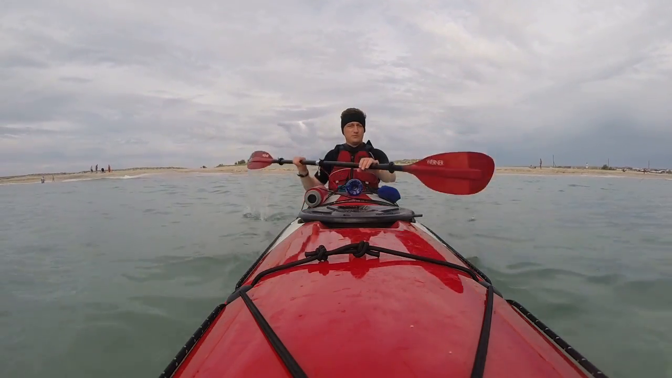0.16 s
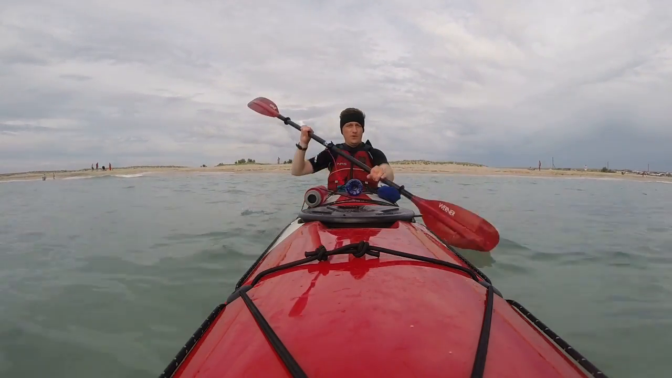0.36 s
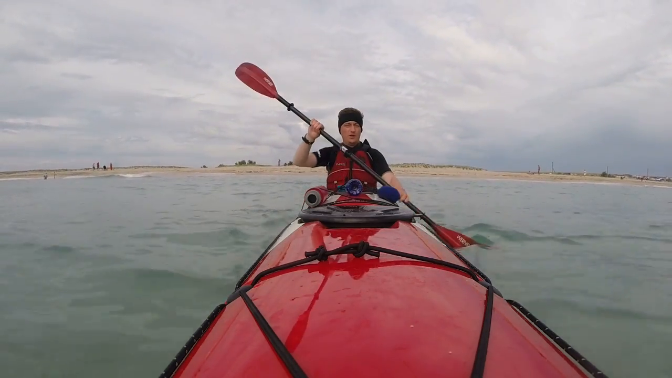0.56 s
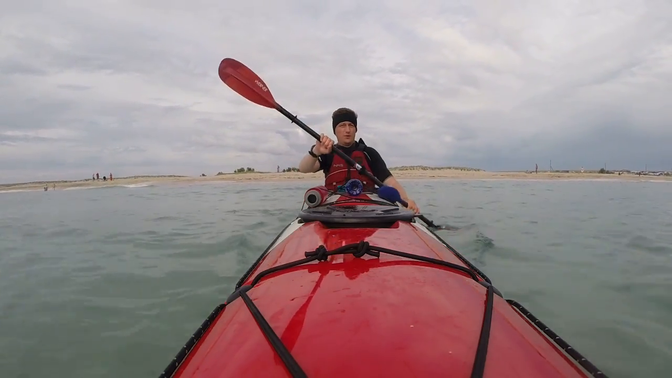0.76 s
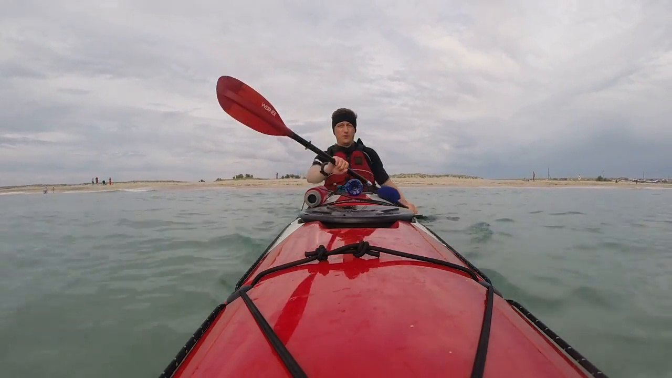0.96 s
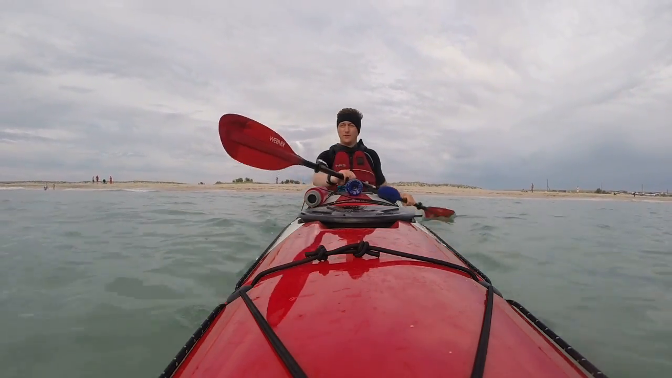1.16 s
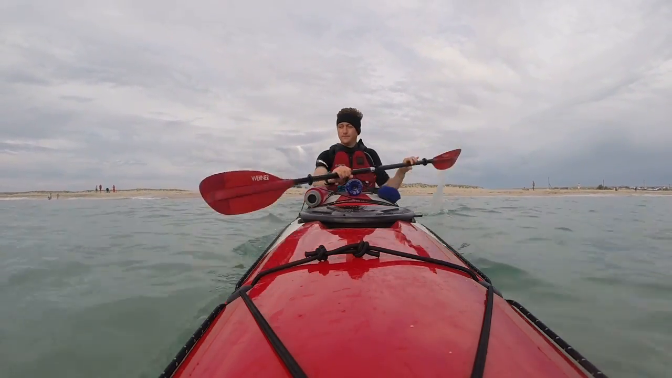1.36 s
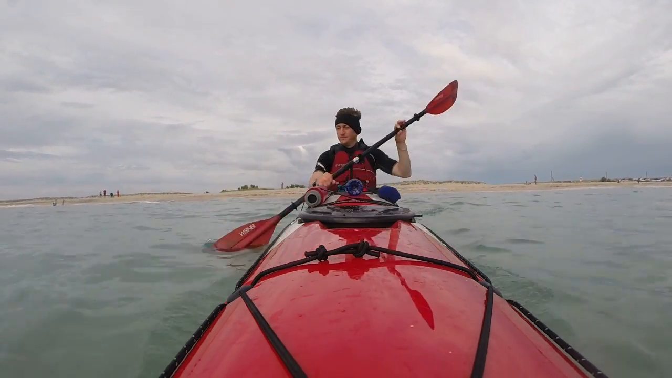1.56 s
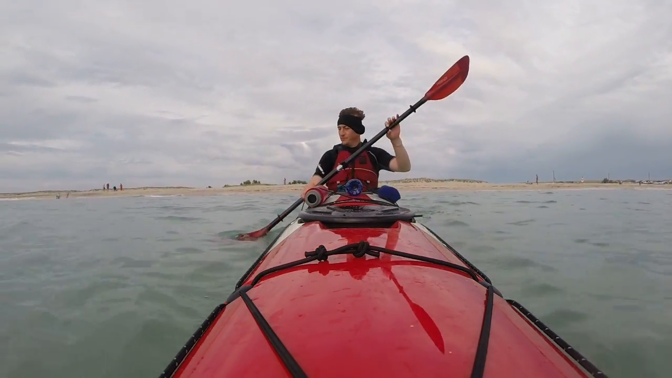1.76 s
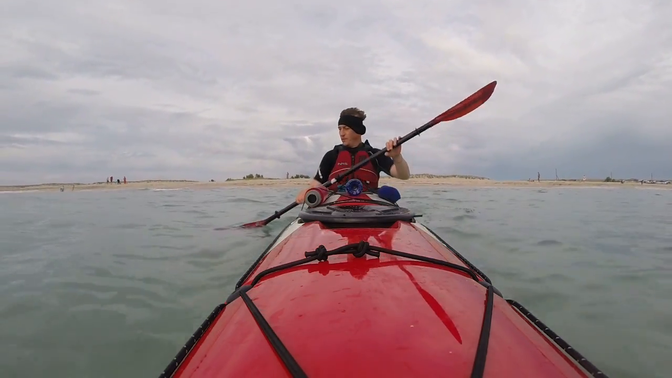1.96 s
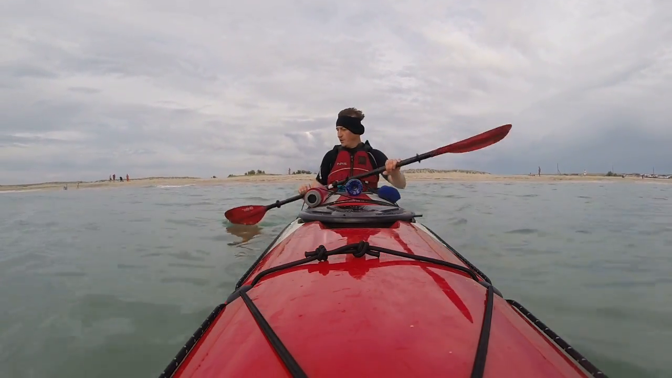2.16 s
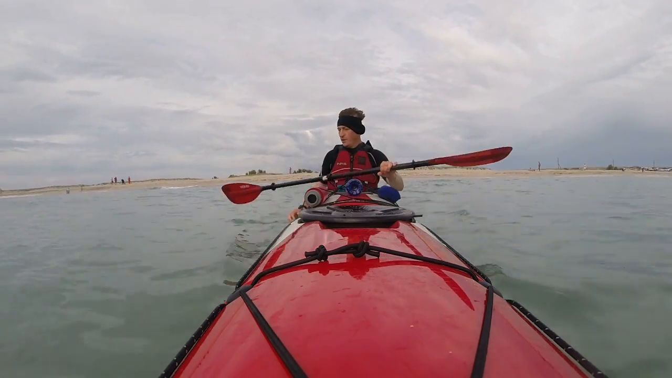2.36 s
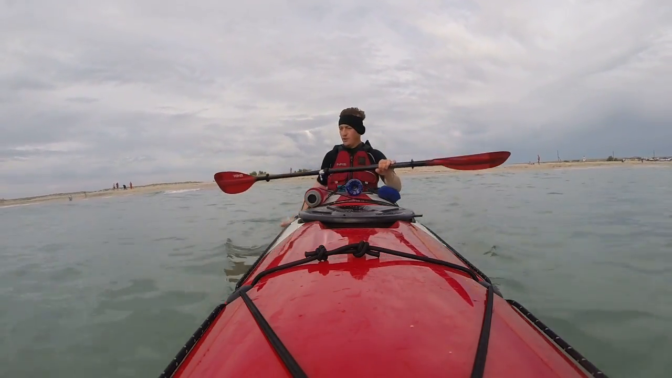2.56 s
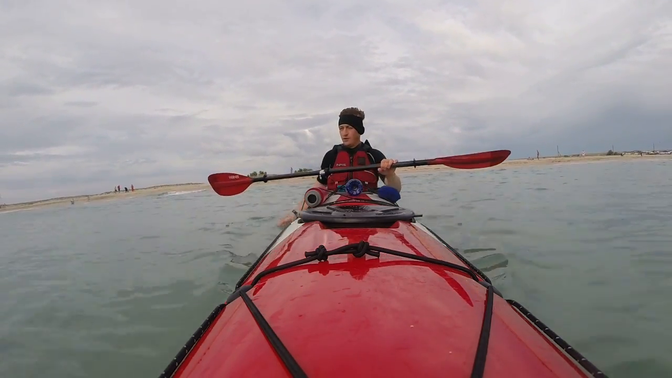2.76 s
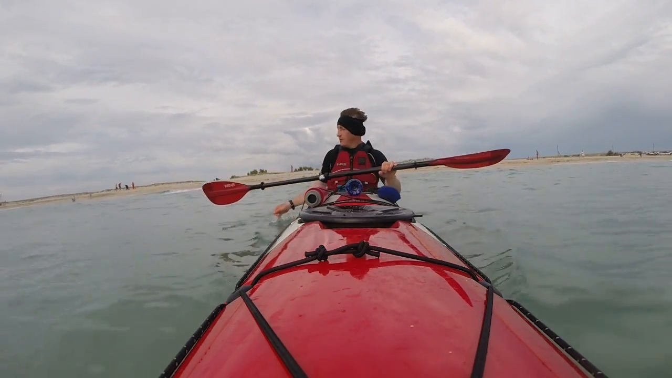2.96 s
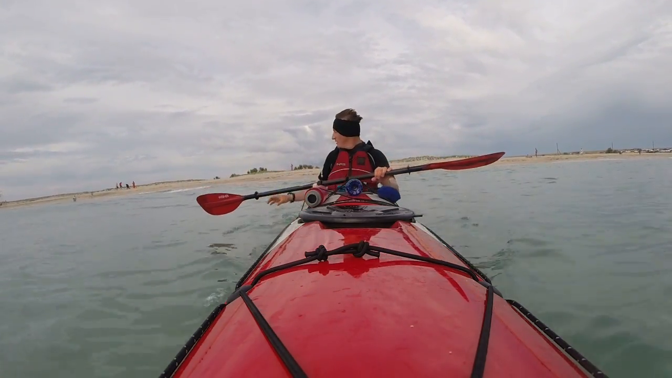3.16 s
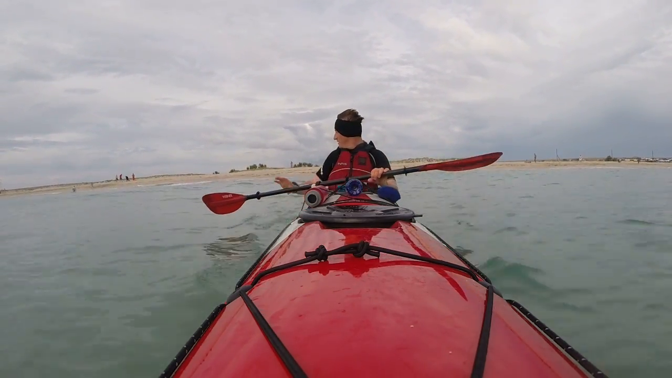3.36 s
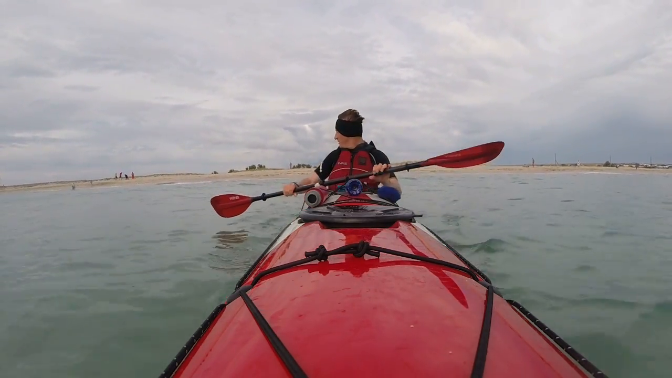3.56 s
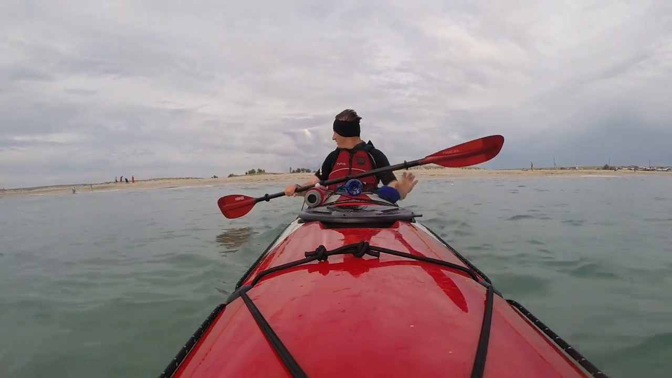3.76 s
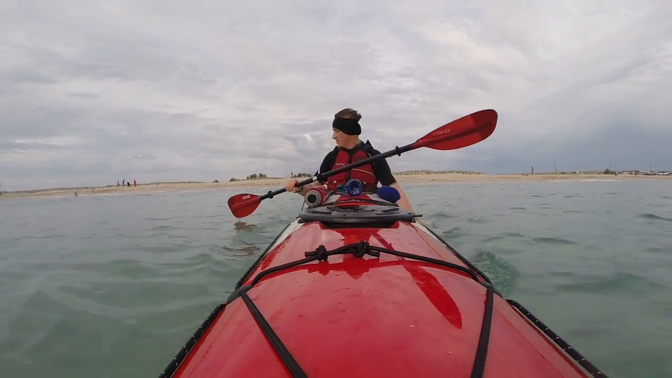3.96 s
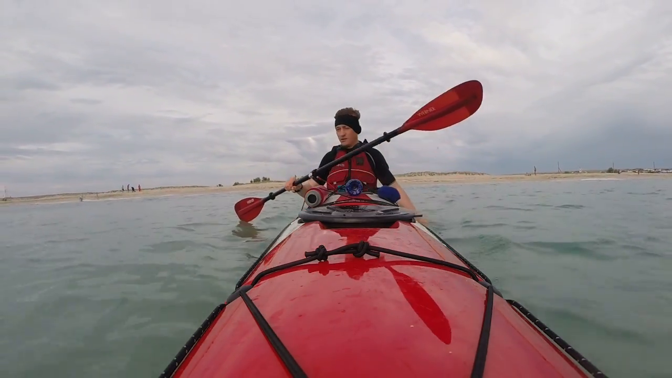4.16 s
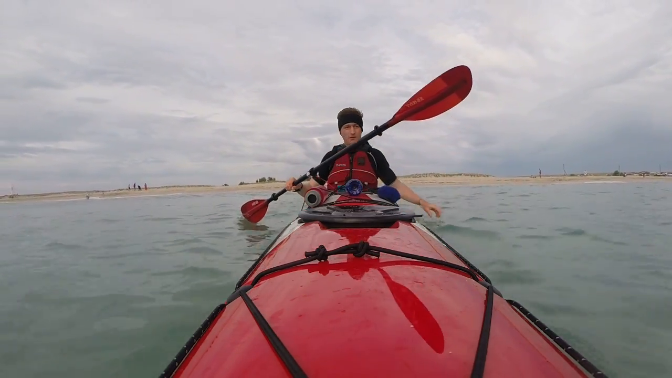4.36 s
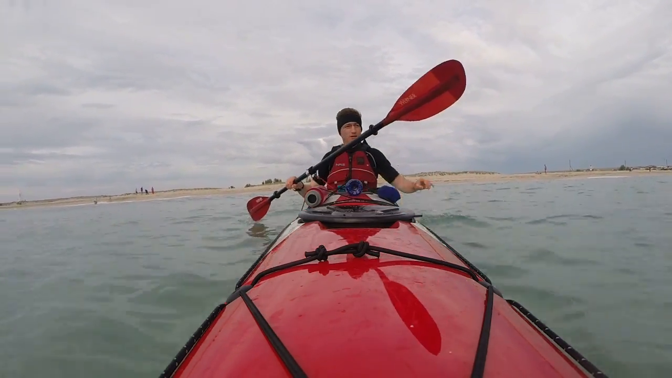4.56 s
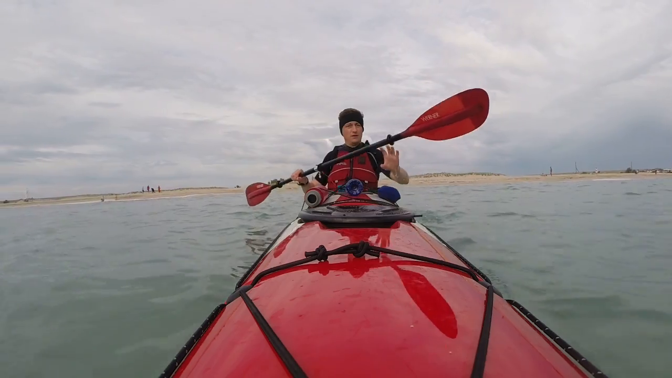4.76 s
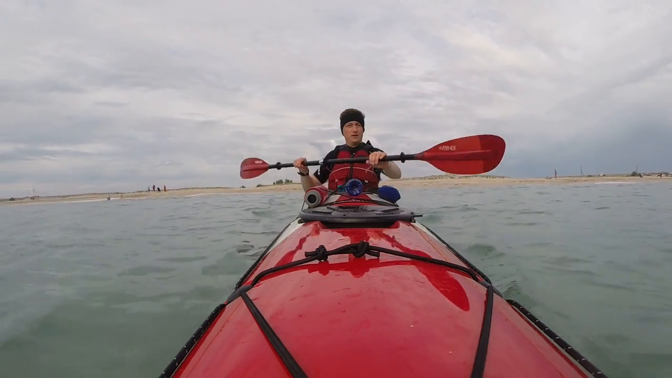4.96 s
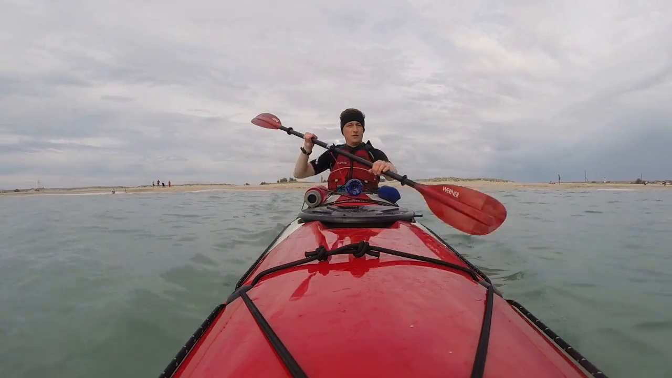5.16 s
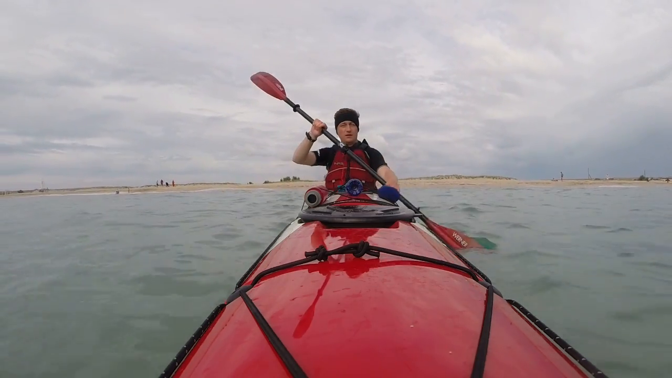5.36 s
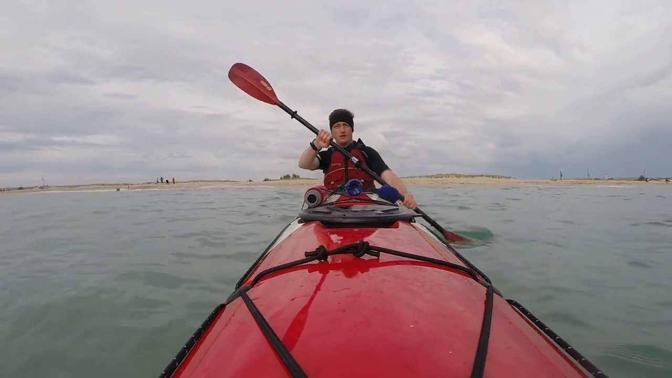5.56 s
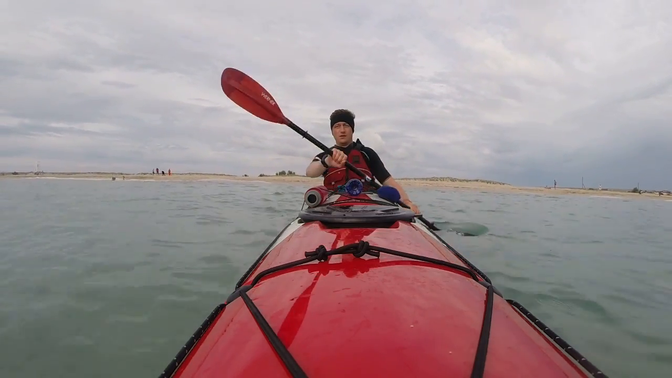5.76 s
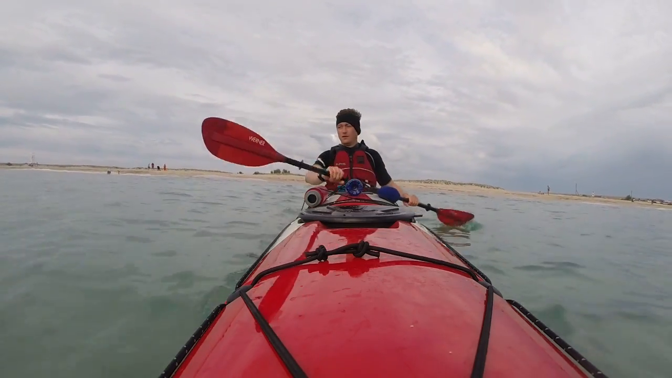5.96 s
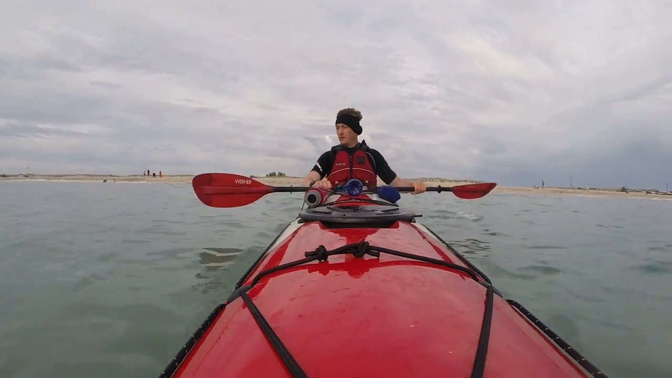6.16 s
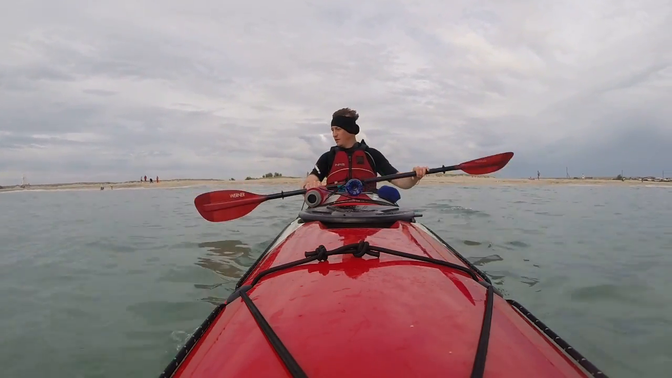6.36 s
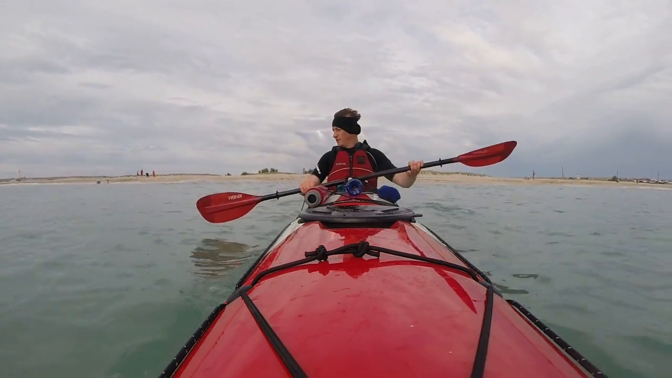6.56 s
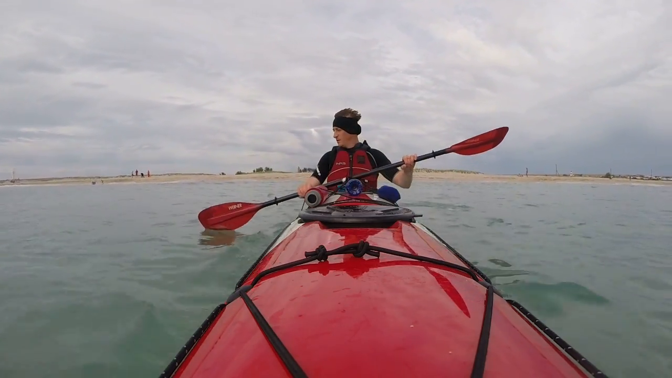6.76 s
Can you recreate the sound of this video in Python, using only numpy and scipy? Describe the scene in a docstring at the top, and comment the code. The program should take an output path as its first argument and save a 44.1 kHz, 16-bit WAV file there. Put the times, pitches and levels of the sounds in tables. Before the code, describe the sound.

Heard from a camera in a waterproof housing on a kayak's fore deck: faint steady hiss with a thin whine, bubbly water gurgling along the hull. Paddle strokes bring sharp plops, short splashes and drips, with soft low hull rumble. A gurgling, dripping glide fades into near quiet, small plops return midway, then a hollow double slap and rush of bubbles close the scene.

```python
"""A sea kayak on calm water, heard from a camera in a waterproof housing on the fore deck, for 6.8 s.
Camera hiss, whine and buzz (noise, tones) run throughout; water runs along the hull as swarms of tiny bubbles.
Trapped air plops as ringing bubbles from the start; shoves stir a low hull rumble; blades splash and drip.
Wavelets soon slap the hollow hull, rung as decaying modes; a soft low wind buffet hits the microphone at 2.1 s.
The hardest slaps come near 6.1 s. Deck and housing echo and colour every plop and drop."""
import sys
import numpy as np
from scipy import signal
from scipy.fft import rfft, irfft
from scipy.io import wavfile

SR = 44100
rng = np.random.default_rng(int(sys.argv[2]) if len(sys.argv) > 2 else 0)


def generate_wav(signal):
    """Clip the signal to [-1, 1] and save it as 16-bit WAV at the path in sys.argv[1]."""
    frames = np.transpose(np.atleast_2d(signal))
    scaled = np.clip(frames, -1, 1) * 32767
    pcm = np.round(scaled).astype(np.int16)
    wavfile.write(sys.argv[1], SR, pcm)


N = 299880
TIME = np.arange(N) / SR  # s

# relative response of deck and housing to the water's sound: frequency_hz, gain_db
HOUSING_RESPONSE = [(150, -10.5), (330, -11.5), (440, -5), (560, -8), (750, -5), (950, -13), (1450, -3.5),
                    (2500, -5), (3050, -18), (3800, -13.5), (5100, -17.5), (6500, -16.5), (8000, -25.5),
                    (13000, -71)]


def undb(db):
    """Decibels to amplitude gain."""
    return 10 ** (np.asarray(db) / 20)


def unit(x):
    """Scale to rms 1."""
    return x / np.sqrt(np.mean(x ** 2))


def add(out, start_s, sound):
    """Mix a sound into out at start_s, cut at the end."""
    i = int(np.clip(start_s * SR, 0, N - 1))
    out[i:i + len(sound)] += sound[:N - i]


def colour(x, points, size=4096):
    """Minimum-phase filter through (Hz, dB) points, straight in dB over log frequency."""
    hz, db = np.transpose(points)
    grid_hz = np.maximum(np.arange(size // 2 + 1) * SR / size, 1)
    magnitude = undb(np.interp(np.log(grid_hz), np.log(hz), db))
    # folding the cepstrum makes the response causal
    cepstrum = irfft(np.log(magnitude))
    cepstrum[1:size // 2] *= 2
    cepstrum[size // 2 + 1:] = 0
    impulse = irfft(np.exp(rfft(cepstrum)))
    return signal.fftconvolve(x, impulse)[:len(x)]


def band(x, lo_hz, hi_hz, order=2):
    """Butterworth band-pass."""
    edges_hz = [lo_hz, min(hi_hz, SR / 2 - 1)]
    return signal.sosfilt(signal.butter(order, edges_hz, "band", fs=SR, output="sos"), x)


def decay(t, t60_s):
    """Exponential decay by 60 dB in t60_s."""
    return np.exp(-np.log(1000) * t / t60_s)


def spell(start_s, length_s, attack_s, release_s):
    """Envelope: straight rise from start_s, hold until length_s is over, exponential release."""
    rise = np.clip((TIME - start_s) / attack_s, 0, 1)
    return rise * np.exp(-np.maximum(TIME - start_s - length_s, 0) / release_s)


def background():
    """Calm sea and hiss, with a thin whine and a faint pulsed buzz from the camera's electronics."""
    # calm sea and microphone hiss, relative spectrum: frequency_hz, density_db
    calm_spectrum = [(12, -15), (20, -0.5), (57, 0.5), (124, -6), (445, -8.5), (940, -18.5), (1550, -14.5),
                     (1830, -19.5), (2480, -22.5), (7720, -34.5), (8380, -34.5), (9630, -37),
                     (11100, -34.5), (12000, -37.5), (15000, -46.5)]
    whine_hz, buzz_hz, pulse_hz = 10750, 8330, 50
    hiss = undb(-53.5) * unit(colour(rng.standard_normal(N), calm_spectrum))
    pulse_phase = 2 * np.pi * pulse_hz * TIME
    whine = undb(-69) * np.sin(2 * np.pi * whine_hz * TIME + .55 * np.sin(pulse_phase))
    buzz_noise = unit(band(rng.standard_normal(N), buzz_hz - 60, buzz_hz + 60))
    buzz = undb(-70) * buzz_noise * np.maximum(np.cos(pulse_phase), 0)
    return hiss + whine + buzz


def flow():
    """Gains of gurgle, trickle and spray: each run of water starts quickly, holds and drains away."""
    # water running off a blade and along the hull, relative levels:
    # start_s, length_s, gurgle_db, trickle_db, spray_db
    runs = [(-.05, 0.15, -54, -53.5, -59), (0.155, 0.79, -55, -63.5, -63), (1.091, 0.19, -45, -49.5, -57.5),
            (1.505, 0.22, -52, -60, -61), (1.737, 0.22, -47, -61.5, -66.5), (2.012, 0.37, -45, -58, -63),
            (2.433, 0.87, -44.5, -59, -62), (4.002, 0.54, -58, -66, -71), (5.063, 0.073, -52.5, -74, -60),
            (5.34, 0.31, -51, -51.5, -72), (6.054, 0.59, -41, -48.5, -59)]
    gains = 0
    for start_s, length_s, *levels_db in runs:
        gains = gains + undb(levels_db)[:, None] * spell(start_s, length_s, attack_s=.036, release_s=.038)
    return gains


def swarm(lo_hz, hi_hz, cycles, spread_db, count):
    """Many short-lived bubbles of chance pitch, size and life, heard through the housing; rms 1."""
    when, pitch, size, life = rng.random((count, 4)).T[:, :, None]
    hz = lo_hz * (hi_hz / lo_hz) ** pitch
    # exponentially spread levels, capped
    gain = undb(spread_db * np.minimum(-np.log(1 - size), 4)) * np.sqrt(hz)
    n = np.arange(int(6 * cycles * SR / lo_hz))
    turns = hz * n / SR
    rings = gain * np.exp(-turns / (cycles * (.5 + life))) * np.sin(2 * np.pi * turns)
    places = (when * N).astype(int) + n
    total = np.bincount(places.ravel(), rings.ravel(), N)[:N]
    return unit(colour(total, HOUSING_RESPONSE))


def lapping(rate_hz, depth_db):
    """Water comes in uneven little gushes: a gain with a new random target rate_hz times a second."""
    knots_s = np.arange(0, N / SR + 1, 1 / rate_hz)
    targets = np.clip(rng.standard_normal(len(knots_s)), -2, 1.5)
    return undb(depth_db * np.interp(TIME, knots_s, targets))


def wash(gains):
    """Big, middling and tiny bubbles follow the flow and surge where a blade tears the surface."""
    # a blade or hand tears the surface, relative levels: start_s, length_s, gurgle_db, splash_db, spray_db
    splashes = [(0.498, 0.033, -56, -43, -71), (0.583, 0.23, -43, -53, -71), (1.094, 0.09, -37, -39.5, -44),
                (1.355, 0.049, -49, -48.5, -52), (1.471, 0.02, -16.5, -33.5, -52),
                (4.017, 0.059, -70, -47, -52.5), (5.576, 0.11, -46.5, -54.5, -56),
                (5.85, 0.028, -45, -50, -69), (5.921, 0.2, -34.5, -60, -66), (6.051, 0.049, -30, -29, -45)]
    for start_s, length_s, *levels_db in splashes:
        surge = np.exp(-np.abs((TIME - start_s) / length_s * 2 - 1) ** 3)
        gains = [gain + undb(db) * surge for gain, db in zip(gains, levels_db)]
    gurgle_gain, trickle_gain, spray_gain = gains
    gurgle = swarm(370, 860, cycles=3.5, spread_db=1.5, count=2600) * lapping(30, 1.4)
    trickle = swarm(1200, 2750, cycles=5, spread_db=3.4, count=4200)
    fizz = swarm(2900, 10000, cycles=2, spread_db=2.5, count=10000)
    droplets = swarm(3000, 7000, cycles=5, spread_db=4, count=1300)
    spray = .6 * fizz + .8 * droplets
    gushing = undb(3.5) * trickle_gain * trickle + undb(-2.5) * spray_gain * spray
    return undb(-4.5) * gurgle_gain * gurgle + lapping(36, 2.8) * gushing


def bubble(hz, decay_s, glide, swell_cycles):
    """An air pocket swells quickly, rings out and rises in pitch as it nears the surface; envelope peak 1."""
    t = np.arange(int(2 * np.pi * decay_s * SR) + 2) / SR
    envelope = (1 - np.exp(-(t * hz / swell_cycles) ** 2)) * np.exp(-t / decay_s)
    pitch_hz = hz * (1 + glide * (np.tanh(t / decay_s / 2) - .5))
    return envelope / envelope.max() * np.sin(2 * np.pi * np.cumsum(pitch_hz) / SR)


def plop(hz, decay_ms):
    """Water parts with a soft hiss, closes with a broad crack, leaves a ringing bubble: (lead-in, ring)."""
    decay_s = decay_ms / 1000
    tone = bubble(hz, decay_s, glide=.095, swell_cycles=.89)
    t = np.arange(len(tone)) / SR
    noise = rng.standard_normal((2, SR // 4))
    # even the smallest drop knocks down into the middle range
    crack_noise = unit(band(noise[0, :len(t)], min(hz * .67, 1700), hz * 1.228, order=4))
    crack = crack_noise * np.exp(-t / min(decay_s, .004))
    fade = np.sin(np.pi * np.linspace(0, 1, int(.009 * SR)) ** 2)
    hiss = unit(band(noise[1, :len(fade)], hz * .7, hz)) * fade
    return undb(-28) * hiss, .77 * tone + .44 * crack


def strays(gain, per_s, lo_hz, hi_hz, above_db, spread_db):
    """Faint events at chance times and pitches, as strong as the flow allows: start_s, pitch_hz, level_db."""
    count = int(per_s * N / SR)
    jitter, pitch, size = rng.random((count, 3)).T
    when = (np.arange(count) + jitter) / count
    flow_db = 20 * np.log10(gain[(when * N).astype(int)] + 1e-9)
    level_db = flow_db + above_db + spread_db * (2 * size - 1)
    return list(zip(when * N / SR, lo_hz * (hi_hz / lo_hz) ** pitch, level_db))


def plops(gurgle, trickle, spray):
    """Trapped air rings at its own pitch; drops tick over a duller knock; the flow adds stray bubbles."""
    # air trapped by a blade or under the hull: start_s, pitch_hz, level_db, decay_ms
    air_pockets = [(.074, 1590, -33.5, 3.4), (.175, 1950, -36, 2.9), (.6065, 827, -30, 17),
                   (0.6164, 2250, -11, 1.7), (0.6156, 1593, -7, 2), (0.7042, 2660, -13, 1.8),
                   (.7112, 2430, -8.5, 1.7), (0.8383, 2335, -22.5, 7.5), (.849, 1615, -23, 3.2),
                   (1.025, 1313, -32.5, 20), (1.075, 553, -21, 9), (1.099, 569.3, -32, 18),
                   (1.129, 1263, -24.5, 16), (1.163, 1365, -28.5, 13), (1.177, 792, -25, 4.2),
                   (1.1798, 2440, -23, 2.3), (1.232, 2150, -27, 3.9), (1.262, 1420, -27.5, 10.8),
                   (1.458, 2610, -30.5, 3.5), (1.4752, 1376, -11, 4), (1.4775, 754, -12, 3.7),
                   (1.4947, 486, -23.5, 6.6), (1.5403, 1300, -15, 3.7), (1.556, 1440, -25.5, 3.2),
                   (1.83, 2060, -34.5, 3.2), (2.085, 2160, -29, 3.4), (2.146, 2470, -38, 5),
                   (2.280, 2070, -27.5, 1.4), (2.394, 1800, -32.5, 2.4), (2.489, 1520, -26, 1.7),
                   (2.626, 1630, -23.5, 1.4), (2.628, 488, -33, 9.9), (3.099, 1614, -34, 11),
                   (3.2975, 1840, -25.5, 3.6), (3.352, 2270, -27.5, 3.9), (3.994, 1820, -41, 14),
                   (4.046, 685, -26, 6.2), (4.0527, 1734, -14, 2.4), (4.067, 702, -24, 9.8),
                   (4.215, 580, -36.5, 6.9), (4.365, 1600, -30, 3), (4.373, 1890, -18.5, 2.6),
                   (5.137, 1510, -41, 2.8), (5.248, 1690, -9.5, 1.85), (5.274, 587, -31, 7),
                   (5.5804, 346, -26, 3.6), (5.612, 1495, -31, 13), (5.949, 543, -29, 21),
                   (5.97, 510, -24.5, 7.5), (6.026, 1730, -22.5, 3.2), (6.065, 2270, -9.5, 2.4),
                   (6.073, 480, -4, 3.9), (6.0753, 700, -5, 3), (6.0814, 412, -17.5, 22.5),
                   (6.084, 1530, -21, 4.5), (6.0984, 520, -16.5, 2), (6.1845, 2290, -29, 8.3),
                   (6.2315, 1523, -15.5, 5.1), (6.241, 1370, -26, 12.5), (6.2532, 430, -20, 8.2),
                   (6.379, 2350, -29, 3), (6.428, 2200, -30.5, 4.1), (6.5501, 2486, -24.5, 3.7),
                   (6.591, 2070, -31.5, 4.3), (6.653, 1720, -27, 3.9)]
    # drops falling from the raised blade: start_s, pitch_hz, level_db
    drips = [(0.504, 6050, -44.5), (.616, 3440, -21), (0.761, 4200, -37.5), (.895, 6030, -43),
             (1.145, 4070, -31), (1.378, 5520, -41.5), (1.420, 2650, -27.5), (1.764, 4180, -26.5),
             (1.7895, 3700, -34.5), (1.814, 6040, -44), (1.880, 4330, -27), (1.936, 3280, -41),
             (2.031, 4540, -36.5), (2.297, 2680, -30), (2.4729, 3840, -23.5), (2.487, 6200, -38),
             (2.6263, 6340, -31), (2.629, 4040, -34.5), (2.742, 3880, -41.5), (2.7886, 2500, -31),
             (2.881, 4030, -31.5), (2.939, 3960, -38.5), (3.009, 6000, -38.5), (3.9697, 3800, -39),
             (4.021, 4940, -42), (4.0542, 4450, -36), (4.0645, 6000, -38.5), (4.195, 3450, -32),
             (4.381, 4120, -39), (5.361, 5100, -42.5), (5.613, 4200, -37.5), (6.030, 4480, -24),
             (6.0585, 6560, -27), (6.0851, 4500, -26), (6.326, 3260, -26.5), (6.379, 3910, -34),
             (6.4935, 3520, -37.5), (6.6207, 4020, -37)]
    drip_decay_ms, plink_decay_ms, glug_decay_ms = 2.12, 4.7, 13
    knock_hz, knock_above_drop_db, knock_decay_ms = 1664, .5, 1.56
    drops = drips + strays(spray, per_s=13, lo_hz=2540, hi_hz=7000, above_db=17, spread_db=5.5)
    plinks = strays(trickle, per_s=13, lo_hz=1444, hi_hz=2716, above_db=14, spread_db=6)
    glugs = strays(gurgle, per_s=13, lo_hz=399, hi_hz=692, above_db=1.5, spread_db=4)
    events = list(air_pockets)
    for start_s, hz, db in drops:
        events.append((start_s, hz, db, drip_decay_ms))
        events.append((start_s, knock_hz, db + knock_above_drop_db, knock_decay_ms))
    events += [(*row, plink_decay_ms) for row in plinks]
    events += [(*row, glug_decay_ms) for row in glugs]
    out = np.zeros(N)
    for start_s, hz, db, decay_ms in events:
        lead_in, ring = plop(hz, decay_ms)
        add(out, start_s - len(lead_in) / SR, undb(db) * np.concatenate([lead_in, ring]))
    return out


def deck(x, echo_s, echo_db, ring_db, low_t60_s, high_t60_s):
    """The hull side throws back a quick echo; deck and housing ring on briefly, the lows longest."""
    t = np.arange(SR // 3) / SR
    low = band(rng.standard_normal(len(t)), 87, 1210) * decay(t, low_t60_s)
    high = band(rng.standard_normal(len(t)), 1280, 12000) * decay(t, high_t60_s)
    onset = 1 - np.exp(-t / .00097)
    response = undb(ring_db) * colour((low + high) * onset, HOUSING_RESPONSE)
    echo = np.interp(TIME - echo_s, TIME, x)
    return x + undb(echo_db) * echo + signal.fftconvolve(x, response)[:N]


def rumble():
    """Hull's lowest resonance and broader heaving, stirred by shoves and dying away, plus one low wind buffet."""
    # strokes and wavelets that rock the boat and flex its hull, relative levels: start_s, level_db
    shoves = [(.27, -48), (.59, -30.5), (1.11, -35.5), (1.46, -32), (2.3, -48.5), (3.05, -56), (4.0, -39.5),
              (4.28, -52), (5.0, -56.5), (5.5, -39.5), (6.01, -35.5), (6.33, -44.5)]
    attack_s, hold_s, release_s = .052, .061, .14
    flex = unit(band(rng.standard_normal(N), 57.6, 68.8))
    heave = unit(band(rng.standard_normal(N), 22, 120))
    rocking = undb(-55)  # afloat, between shoves
    for start_s, db in shoves:
        rocking = rocking + undb(db) * spell(start_s, attack_s + hold_s, attack_s, release_s)
    buffet_envelope = spell(2.13, length_s=.16, attack_s=.044, release_s=.08)
    buffet = undb(-50.5) * unit(band(rng.standard_normal(N), 20, 36)) * buffet_envelope
    return rocking * (undb(-6.5) * flex + undb(-14) * heave) + buffet


def slaps():
    """A wavelet pushes on the hull; each lands elsewhere and so weights the modes anew."""
    # water slapping the hull, relative levels: start_s, level_db, contact_ms
    hits = [(.616, -34, 1.5), (0.707, -30, 0.26), (1.477, -20, 0.51), (1.54, -19, 1.64), (4.045, -28.5, .8),
            (4.193, -37, 1.2), (4.374, -34.5, 0.42), (5.25, -34, 0.45), (5.580, -35.5, 0.94),
            (6.075, -6.5, 1.8), (6.225, -10.5, 3.36)]
    # hull modes, nominal: frequency_hz, level_db, t60_s
    hull_modes = [(100, -19, 0.17), (133, -18, 0.28), (195, -19.5, 0.28), (260, -9, 0.033),
                  (437, -11, 0.052), (442, -1, 0.2), (511, -1, 0.063), (563.5, -5, 0.23), (646, 3.5, 0.091),
                  (705.6, -2.5, 0.18), (784, 0, 0.099), (1170, -10, 0.21), (1220, -25, 0.091),
                  (1429, 12, 0.051)]
    out, t = np.zeros(N), np.arange(SR // 2) / SR
    hz, db, t60_s = np.transpose(hull_modes)[:, :, None]
    onset = 1 - np.exp(-t / .00061)
    for start_s, slap_db, contact_ms in hits:
        weight_db, detune, side = rng.standard_normal((3, len(hull_modes), 1))
        # long contact dulls the high modes
        softness = 1 / np.sqrt(1 + (hz * contact_ms / 1000) ** 4)
        gain = softness * np.sign(side) * undb(db + weight_db)
        tones = np.sin(2 * np.pi * hz * (1 + .0049 * detune) * t)
        ring = np.sum(gain * tones * decay(t, t60_s), axis=0)
        add(out, start_s, undb(slap_db - 6) * ring * onset)
    return out


def scene():
    """Plops and drops pass over the deck; wash, hull, wind and camera add their own."""
    gains = flow()
    bed = wash(gains) + slaps() + rumble() + background()
    water = deck(plops(*gains), echo_s=.0036, echo_db=-9.5, ring_db=-24, low_t60_s=.15, high_t60_s=.075)
    return (water + bed)[None]


def record(dry):
    """The camera softly rounds the loudest peaks and cuts the treble above 15.2 kHz."""
    rounded = dry / (1 + (dry / .88) ** 4) ** .25
    return signal.sosfilt(signal.ellip(10, .2, 70, 15200, fs=SR, output="sos"), rounded)


dry = scene()
out = record(dry)
generate_wav(out)
```